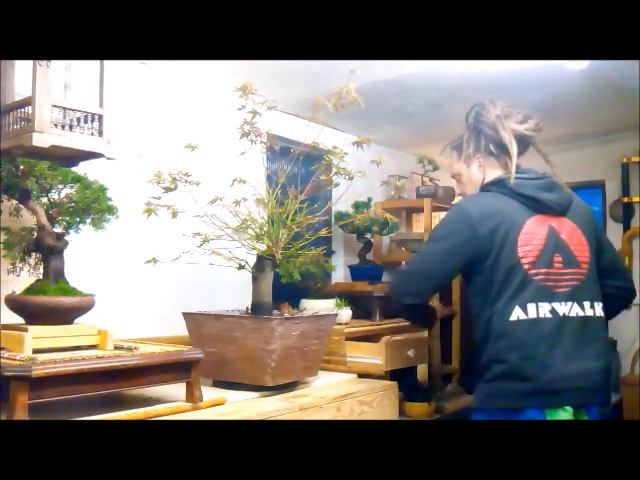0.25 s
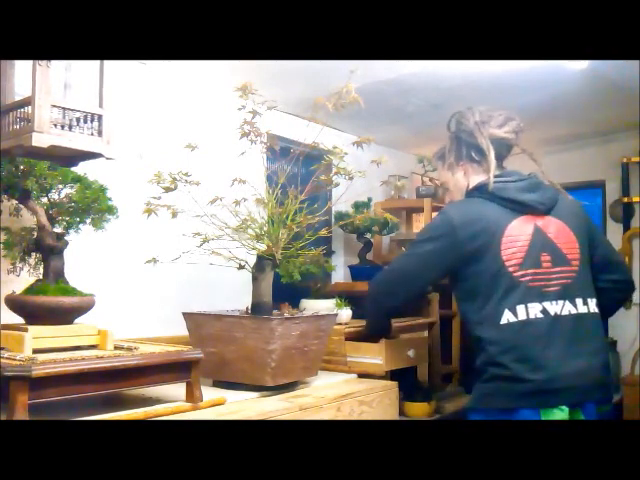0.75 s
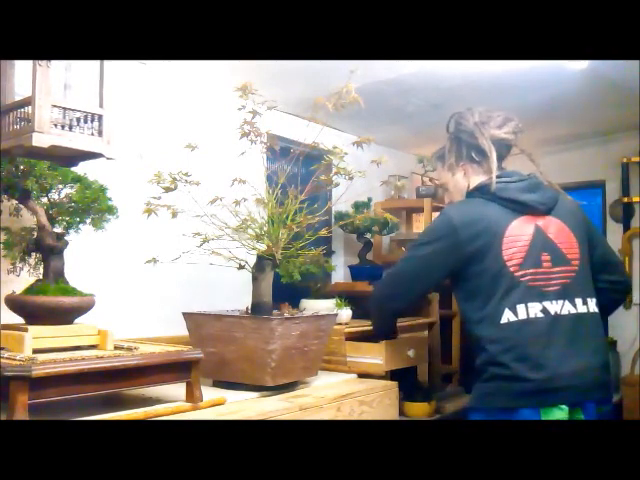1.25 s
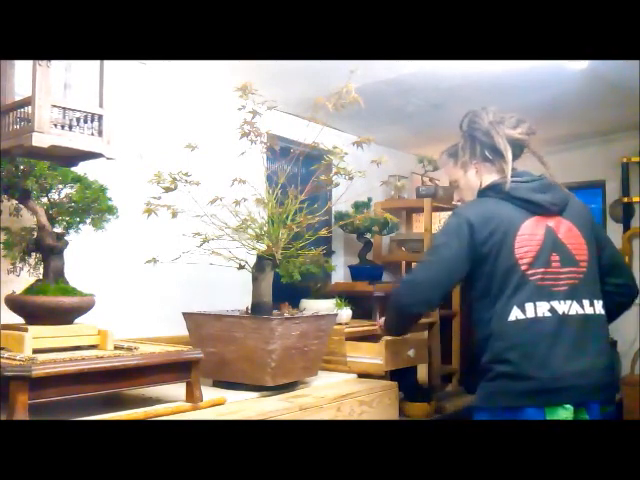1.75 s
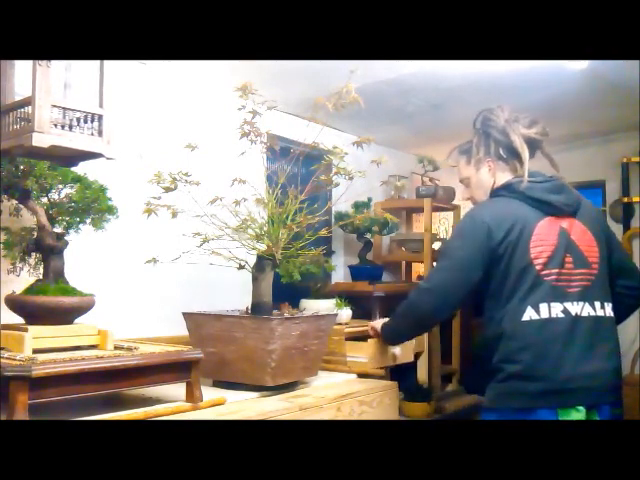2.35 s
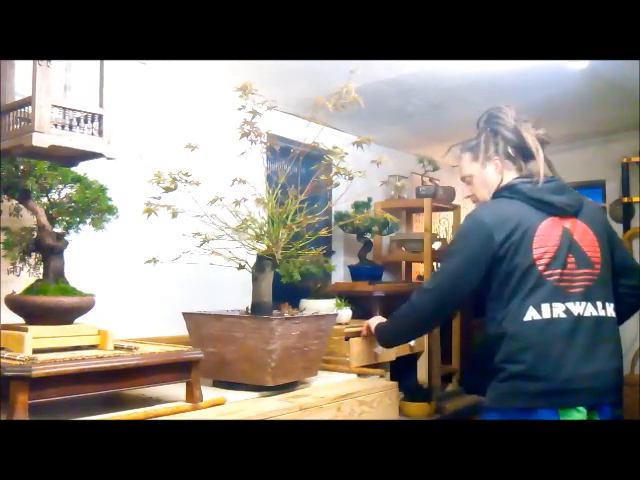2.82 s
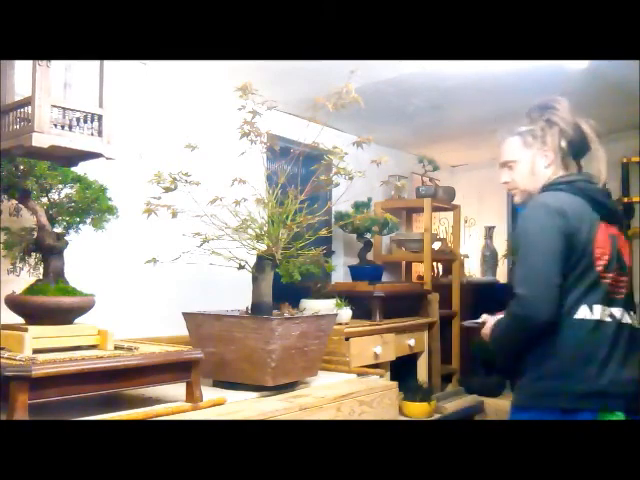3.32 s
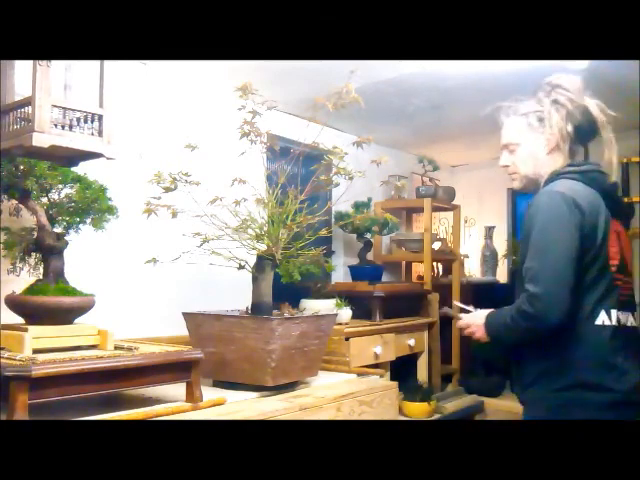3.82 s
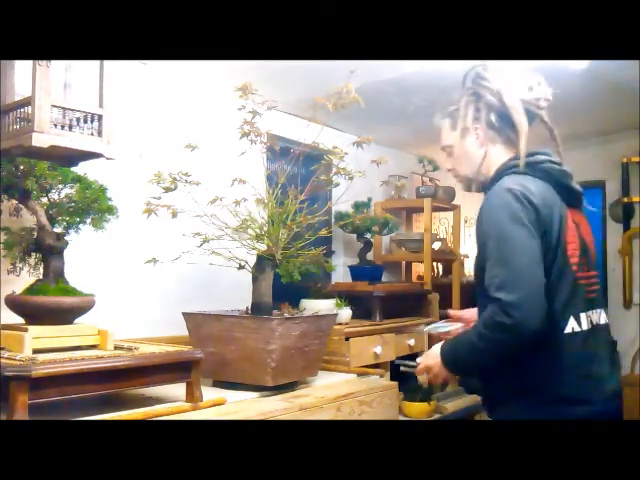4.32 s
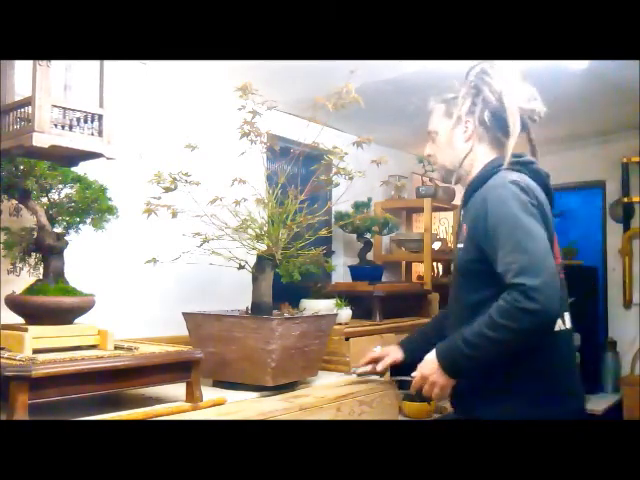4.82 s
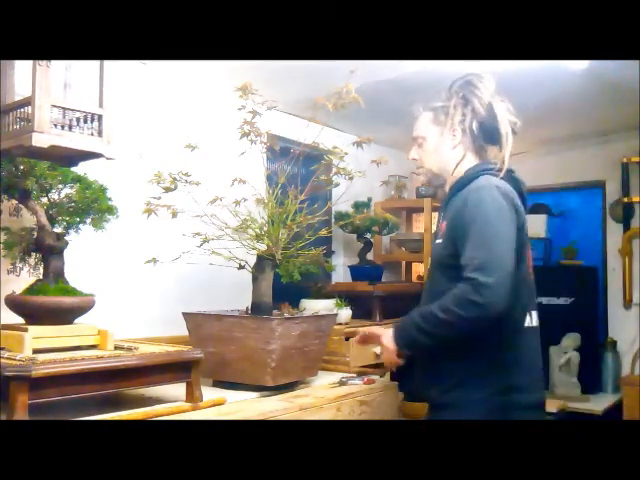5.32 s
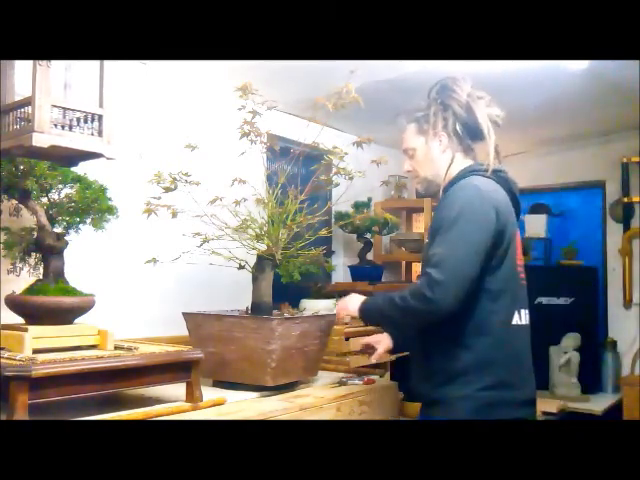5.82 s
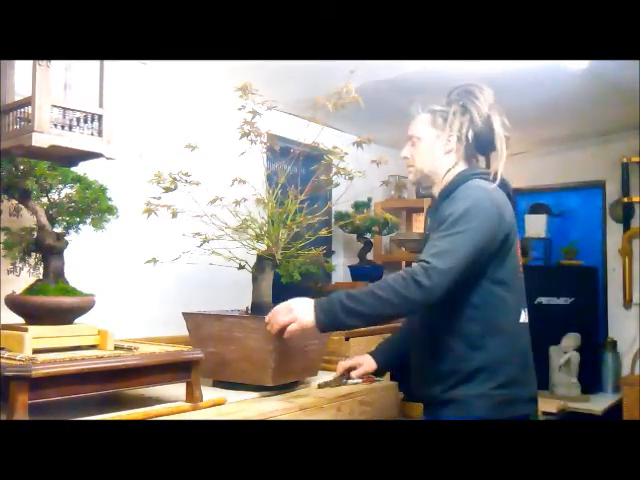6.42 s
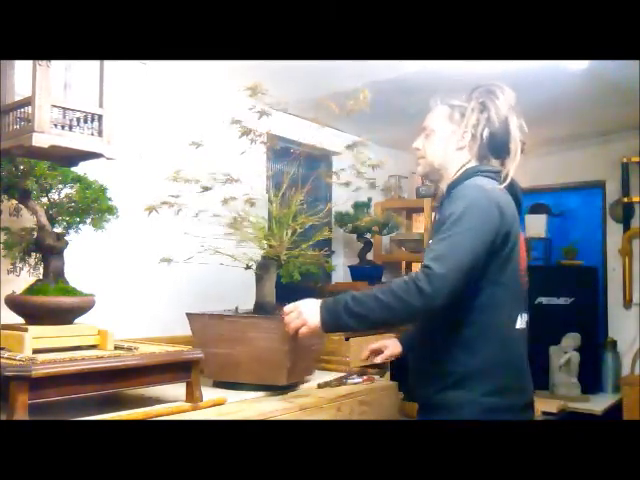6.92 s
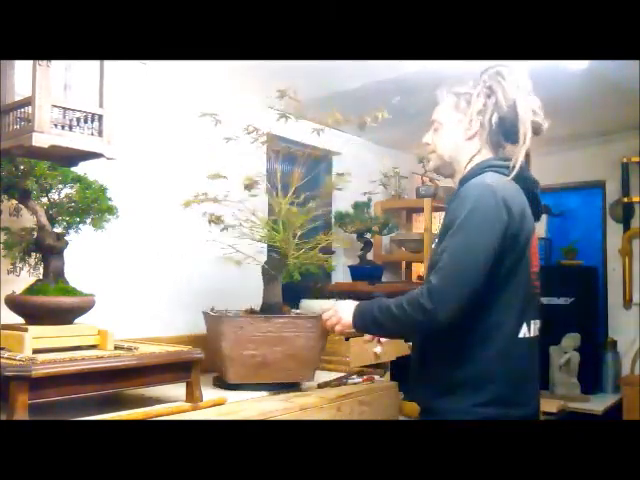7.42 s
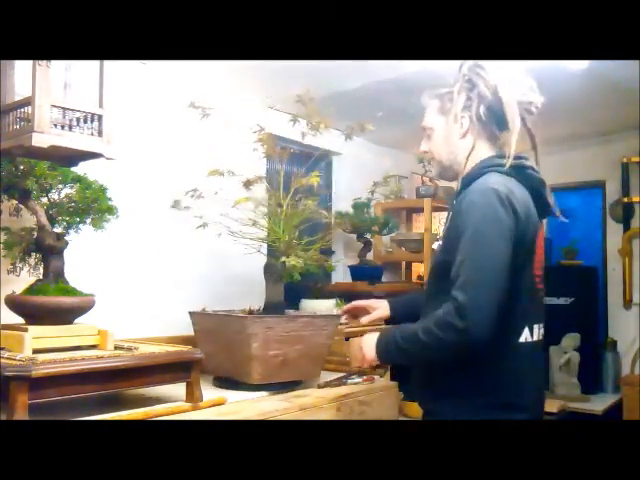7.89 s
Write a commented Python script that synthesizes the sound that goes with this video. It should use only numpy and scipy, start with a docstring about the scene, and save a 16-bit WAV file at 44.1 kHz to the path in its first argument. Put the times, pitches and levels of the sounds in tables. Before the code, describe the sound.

In a small hissy workshop, tools knock in a drawer, the drawer rumbles closed, steel clinks in a hand, and a wooden bench is knocked and scraped.

```python
"""A small workshop: someone rummages among steel tools in a wooden drawer, slides it shut and clinks
the tools in one hand, then knocks and scrapes things about on a bench, where a clay pot is turned.
Knocks and clinks are short noise bursts plus dying sines; scrapes and the drawer's slide are grains of
friction; its groan is a train of slips. Room reflections follow most of these sounds.
All is heard, over hiss and fluttering treble bands, through a microphone with a sharp presence peak."""
import sys
import numpy as np
from scipy import signal
from scipy.io import wavfile
from scipy.ndimage import uniform_filter1d

SR = 44100
rng = np.random.default_rng(int(sys.argv[2]) if len(sys.argv) > 2 else 0)


def to_wav(s):
    """Save 16-bit WAV."""
    ch = np.atleast_2d(s).T  # columns
    pcm = np.round(np.clip(ch, -1, 1) * 32767)  # PCM
    wavfile.write(sys.argv[1], SR, pcm.astype(np.int16))


N = 359400  # length in samples

# Layer trims in the functions come on top of the levels in these tables.
# spectrum of low room noise and hiss: hz, level_db (relative)
HISS_SPECTRUM = [(20, -11), (35, -13), (50, 2.5), (80, 5), (110, 9), (200, 3), (400, 0), (1000, -4.5),
                 (3000, -7), (4400, -3), (5600, -9), (7400, -13.5), (12500, -19.5), (16000, -13)]
# narrow bands of electrical noise: centre_hz, width_hz (before a factor in the filter), level_db,
# flutter_depth (0-1)
WHINE_BANDS = [(6590, 230, -83.5, 0.05), (8150, 240, -81, 0), (8845, 370, -74.5, 0.85),
               (10610, 510, -72.5, 0.02), (13530, 500, -80, 0.7)]
# moments when a faint fizz switches on in the treble: start_s
FIZZ_TIMES = [1.6, 2.53, 2.88, 6.73, 7.09, 7.59]
# tools knocking in the drawer: start_s, level_db, pitch_hz (of the thump), hardness_db
DRAWER_HITS = [(0.001, -41, 854, 3.5), (0.06, -46, 560, -9), (0.085, -37, 680, -7.5),
               (0.102, -43, 740, 5.5), (0.1525, -26, 540, 2), (0.274, -41.5, 526, 0),
               (0.331, -25.5, 1060, -7), (0.579, -56.5, 510, 2), (0.668, -66, 600, 15),
               (0.847, -45, 570, -6.5), (0.885, -41, 630, -5.5), (1.339, -46.5, 710, -1),
               (1.416, -38.5, 730, -21), (1.597, -63.5, 670, 16.5), (2.124, -53.5, 680, 4)]
# jolts of the drawer on its runners: start_s, level_db
DRAWER_JOLTS = [(2.438, -51), (2.507, -41), (2.668, -42), (2.801, -49)]
# ringing of the drawer: pitch_hz, level_db (before a tilt towards high pitches), t60_s
DRAWER_RING = [(104.8, 3, 0.33), (160, -0.5, 0.21), (395, -4, 0.17), (501.4, 3, 0.24), (878, -18, 0.22),
               (1012, -13, 0.13), (1576, -24, 0.12), (2290, -10.5, 0.064), (3020, -16, 0.26),
               (3600, -4, 0.06), (3680, -11, .12), (4270, -7, 0.39), (4564, -9, 0.053), (5050, -9.5, 0.17),
               (7460, -11, 0.57)]
# spectrum of the tick in a knock: hz, level_db (relative)
TICK_SPECTRUM = [(1500, -28), (2800, 5.5), (3600, 7), (4800, 6.5), (6000, -2), (7500, -14), (11000, -25.5),
                 (16000, -35)]
# decay of the workshop's reflections: hz, t60_s
ROOM_DECAY = [(100, 0.41), (300, 0.17), (800, 0.2), (2000, 0.21), (4500, 0.18), (8000, 0.13),
              (15000, 0.032)]
# short dry scrapes: start_s, length_s, level_db, low_edge_hz
SCRAPE_STROKES = [(0.657, 0.21, -56, 2050), (0.738, 0.082, -55, 397), (3.951, 0.12, -47, 2100),
                  (4.403, 0.093, -52, 850), (4.936, 0.099, -42, 1750), (6.74, 0.094, -55.5, 1620),
                  (7.025, 0.085, -38, 1070)]
# spectra of the drawer's rumble and of grit on its runners: hz, level_db (relative)
RUMBLE_SPECTRUM = [(25, -33), (65, -8), (105, 1.5), (190, 0.5), (280, -7.5), (420, -3), (800, -17),
                   (1600, -33), (5000, -58)]
GRIT_SPECTRUM = [(200, -17), (550, 0), (1100, 6.5), (2000, 2), (3800, 4), (5200, -3.5), (8000, -26),
                 (16000, -39)]
# resonances of the runners: pitch_hz, half_width_hz (at half amplitude), level_db (relative)
RUNNER_RESONANCES = [(200, 125, 3.5), (426, 34, 2.5), (657, 73, -20), (865, 35, 4.5), (1205, 110, -12)]
# the bench shudders as the drawer starts, meets its stop and settles: start_s, level_db
BENCH_SHUDDERS = [(2.341, -68), (2.675, -54), (2.935, -55.5)]
# steel tools meeting in the hand: start_s, level_db, brightness_hz, ring_db, rebound_change_db
STEEL_CLINKS = [(3.651, -41.5, 5360, -5, -2), (3.703, -49, 4000, 1, 1), (3.745, -32, 11000, 3.5, -3),
                (3.796, -41, 3260, -2, -1.5), (3.912, -57, 2960, -7, 0.5), (3.973, -45.5, 4940, -15, 1)]
# ringing of the blades: pitch_hz, level_db (before a tilt towards high pitches), t60_s
STEEL_RING = [(915, 0.5, 0.18), (1794, -10.5, 0.14), (2078, -7.5, 0.24), (2700, -4, 0.23),
              (3140, -7.5, 0.082), (3730, -25, .2), (4150, -22, .16), (4375, -5.5, 0.066),
              (4580, -4.5, 0.098), (4820, -1, .15), (4870, -4, 0.14), (5060, -7, .13), (5390, -4.5, 0.14),
              (6029, -14, 0.13), (7000, -33, .15), (10940, -20, 0.17)]
# knocks on the bench top: start_s, level_db, pitch_hz (of the thump), hardness_db
BENCH_HITS = [(5.1405, -33.5, 435, -20.5), (5.345, -28.5, 550, -16), (5.364, -35, 530, -28),
              (5.4475, -24.5, 644, -25), (5.534, -38.5, 485, -48), (6.4485, -24, 545, -31.5),
              (6.565, -46, 490, -37), (6.62, -27.5, 547, -12.5)]
# ringing of the bench: pitch_hz, level_db (before a tilt towards high pitches), t60_s
BENCH_RING = [(115.1, 2, 0.5), (256.3, 2.5, 0.29), (317, -3, 0.12), (405.3, -0.5, 0.17),
              (495.5, -1.5, 0.051), (548, -10.5, 0.14), (611, -8.5, 0.073), (775, -32, 0.14),
              (893, -3, 0.14), (1127, -5, 0.034), (1216, -7, 0.15), (1790, -6, 0.17)]
# response of the microphone: hz, level_db
MICROPHONE_RESPONSE = [(20, 4.5), (2800, -2), (3600, 0.5), (4150, 6.5), (4600, 8), (5200, 0.5), (6200, 2.5),
                       (20000, 1.5)]

HISS_DB, FLUTTER_HZ = -63, 29.5
JOLT_HZ, JOLT_CLACK_HZ, JOLT_CLACK_DB, JOLT_TICK_DB = 600, 2270, 6, -17
SCRAPE_RISE_S, SCRAPE_WIDTH_HZ = 0.046, 3100
# one push runs the drawer shut: quick start, steady run, slowing to rest
PUSH_START_S, PUSH_ATTACK_S, PUSH_HOLD_S, PUSH_RELEASE_S = 2.3, 0.041, 0.33, 0.38
# midway the wood binds: its slips grow faster and louder up to one moment, then ease off
BIND_S, BIND_RISE_S, BIND_FALL_S = 2.523, .036, .05
SLIPS_LOOSE_HZ, SLIPS_TIGHT_HZ = 135, 203.8
# the blades touch three times, each gap longer than the last
REBOUND_S, REBOUND_SPREAD = .006, 1.65
EDGE_HZ = 15850  # top of the heard band

HZ = np.fft.rfftfreq(8192, 1 / SR) + 1  # the offset keeps it above zero
RING = np.arange(SR // 2) / SR  # half a second, in s
TIME = np.arange(N) / SR


def amp(db):
    """Decibels to amplitude."""
    return 10 ** (np.asarray(db) / 20)


def evened(x):
    """Scales to an RMS of one."""
    return x / np.sqrt(np.mean(x ** 2) + 1e-20)


def read(points, hz):
    """A table of hz and value, joined by lines on a log axis."""
    f, value = np.transpose(points)
    return np.interp(np.log(hz + 1), np.log(f), value)


def add(mix, start_s, sound):
    """Lays a sound into the mix, cut off at the end."""
    part = mix[max(round(start_s * SR), 0):][:len(sound)]
    part += sound[:len(part)]


def band(low_hz, high_hz, order=2):
    """Gain of a pass band with soft edges."""
    low_side = 1 + (low_hz / HZ) ** (2 * order)
    high_side = 1 + (HZ / high_hz) ** (2 * order)
    return 1 / np.sqrt(low_side * high_side)


def hump(hz, octaves, skirt_db=-45):
    """A rounded band about a centre, with skirts."""
    away = np.log2(HZ / hz)
    return np.exp(-.5 * (away / octaves) ** 2) + amp(skirt_db) / (1 + away ** 4)


def hollow(modes, depth, width):
    """Broad peaks about a body's modes: they colour even its shortest noises."""
    peaks = sum(amp(db) / (1 + ((HZ / hz - 1) / width) ** 2) for hz, db, t60 in modes)
    return 1 + depth * peaks


def pulse(gain):
    """The most compact causal (minimum-phase) pulse with this spectrum."""
    log_gain = np.log(np.maximum(gain, gain.max() * 1e-5))
    circle = np.concatenate([log_gain, log_gain[-2:0:-1]])
    spectrum = np.exp(np.conj(signal.hilbert(circle)))
    return np.fft.ifft(spectrum).real[:len(HZ)]


def colour(x, gain):
    """Filters a sound with a spectrum."""
    return signal.oaconvolve(x, pulse(gain))[:len(x)]


def room(x, wet_db, gap_s=.002):
    """Direct sound and a tail of scattered reflections, drawn afresh on each call."""
    taps = rng.choice([-1., 1.], len(RING)) * (rng.random(len(RING)) < .12) * (RING > gap_s)
    hz, t, z = signal.stft(taps, SR, nperseg=256)
    t60 = read(ROOM_DECAY, hz)[:, None]
    tail = signal.istft(z * amp(-60 * t / t60), SR, nperseg=256)[1]
    response = amp(wet_db) * tail / np.linalg.norm(tail)
    response[0] += 1
    return signal.fftconvolve(x, response)


def grains(count, per_s, uneven_db):
    """Friction: many tiny catches of unequal size."""
    chance, size = rng.random(count), rng.exponential(1, count)
    sign = rng.choice([-1, 1], count)
    return (chance < per_s / SR) * sign * amp(uneven_db * np.minimum(size, 4))


def blow(db, gain):
    """A spectrum sized to give this level over a hundredth of a second."""
    return amp(db) * evened(gain) * np.sqrt(SR / 100)


def chatter(share, t60, rise_s=0.00056):
    """First contact, then a few milliseconds of tiny rebounds."""
    hits = rng.standard_normal(len(RING)) * amp(-60 * RING / t60) * (1 - np.exp(-RING / rise_s))
    hits *= share / np.linalg.norm(hits)
    hits[0] += 1
    return hits / np.linalg.norm(hits)


def struck(contact, hits, wet_db, gap_s=0.0014):
    """The crack of a blow and its spread through the room, keeping the blow's energy."""
    crack = room(colour(hits, contact), wet_db, gap_s)[:len(RING)]
    return crack * np.linalg.norm(pulse(contact)) / np.linalg.norm(crack)


def ringing(modes, detune=0.0045):
    """Dying sines; each blow sets their pitch, size and sign a little differently."""
    out = np.zeros(len(RING))
    variations = rng.standard_normal((len(modes), 3))
    for (hz, db, t60), (drift, size_db, side) in zip(modes, variations):
        sine = np.sign(side) * np.sin(2 * np.pi * hz * (1 + detune * drift) * RING)
        mode = sine * amp(-60 * RING / t60)
        out += amp(db + size_db) * mode / np.linalg.norm(mode) * np.sqrt(hz / SR)
    return out


def background(fizz_db=-69, fizz_length_s=0.302):
    """Low room noise and the microphone's hiss, with fluttering electrical bands and bursts of fizz."""
    out = amp(HISS_DB) * evened(colour(rng.standard_normal(N), amp(read(HISS_SPECTRUM, HZ))))
    flutter = np.sin(2 * np.pi * FLUTTER_HZ * TIME)
    for hz, width, db, depth in WHINE_BANDS:
        resonance = 1 / (1 + ((HZ - hz) / width * 1.07) ** 2)
        whine = colour(rng.standard_normal(N), resonance)
        out += amp(db) * evened(whine * (1 + depth * flutter))
    on = sum((TIME > s) & (TIME < s + fizz_length_s) for s in FIZZ_TIMES)
    treble = band(7900, 11260, order=30) * band(14000, 14000, order=2)
    fizz = colour(rng.standard_normal(N), treble)
    return out + amp(fizz_db) * on * evened(fizz)


def contacts(rows, clack_db, clack_share, clack_hz, clack_follow):
    """Splits knocks in three: hardness lifts tick and part of clack; a higher thump has a higher clack."""
    middle_hz = np.median([hz for s, db, hz, hardness in rows])
    parts = []
    for s, db, hz, hardness in rows:
        clack_level = db + clack_db + clack_share * hardness
        clack_pitch = clack_hz * (hz / middle_hz) ** clack_follow
        parts.append((s, db, hz, clack_level, clack_pitch, db + hardness))
    return parts


def knocks(rows, modes, ring_db, level_db, wet_db, rattle, rattle_t60, rattle_rise_s,
           thump_octaves, clack_octaves, skirt_db, bass_db, bass_hz, gap_s):
    """A soft thump, a harder clack and a tick go into a wooden body, which rings on."""
    out = np.zeros(N)
    body = hollow(modes, depth=2.2, width=.022)
    tick = amp(read(TICK_SPECTRUM, HZ))
    for s, thump_db, hz, clack_db, clack_hz, tick_db in rows:
        thump = hump(hz, thump_octaves, skirt_db) + amp(bass_db) * hump(bass_hz, 0.68)
        clack = hump(clack_hz, clack_octaves, skirt_db=-12)
        parts = blow(thump_db, thump * body), blow(clack_db, clack * body), blow(tick_db, tick * body)
        contact = np.linalg.norm(parts, axis=0)  # adds the three as powers
        hits = chatter(rattle, rattle_t60, rattle_rise_s)
        add(out, s, struck(contact, hits, wet_db, gap_s))
        # the body's colour is taken out again: the modes supply it
        add(out, s, colour(amp(ring_db) * ringing(modes), contact / body))
    return amp(level_db) * out


def jolts():
    """Every jolt on the runners has the same thump, clack and tick, at its own strength."""
    return [(s, db, JOLT_HZ, db + JOLT_CLACK_DB, JOLT_CLACK_HZ, db + JOLT_TICK_DB)
            for s, db in DRAWER_JOLTS]


def drawer_knocks():
    """Tools knock and the drawer jolts: blows into a roomy wooden box full of loose things."""
    rows = contacts(DRAWER_HITS, clack_db=-2.0, clack_share=0.24, clack_hz=1840, clack_follow=0.21)
    return knocks(rows + jolts(), DRAWER_RING, ring_db=-2.5, level_db=-6.5, wet_db=2.0,
                  rattle=2.8, rattle_t60=0.023, rattle_rise_s=0.0019,
                  thump_octaves=0.51, clack_octaves=0.63, skirt_db=-15,
                  bass_db=-8.0, bass_hz=177, gap_s=0.0017)


def scrapes(level_db=-4, catch_db=4.0, body_hz=1950, body_db=3):
    """Each stroke swells and fades, catching unevenly as its grains blur into a short rasp."""
    out = np.zeros(N)
    body = amp(body_db * hump(body_hz, .14))
    blade = hollow(STEEL_RING, depth=0.73, width=0.0077)
    for s, length, db, low_hz in SCRAPE_STROKES:
        t = np.arange(0, length, 1 / SR)
        wander = evened(uniform_filter1d(rng.standard_normal(len(RING)), 180))
        friction = grains(len(RING), 8000, 1.5) * amp(catch_db * wander)
        surface = band(low_hz, low_hz + SCRAPE_WIDTH_HZ, order=3) * band(200, 6100, order=5)
        rasp = evened(colour(friction, surface * body * blade)[:len(t)])
        stroke = np.interp(t, [0, SCRAPE_RISE_S, length], [0, 1, 0])
        add(out, s, room(amp(db) * rasp * stroke, wet_db=-5.0))
    return amp(level_db) * out


def drawer_slide(rumble_db=-61.0, grit_db=-61, grit_power=1.1):
    """The drawer rumbles on gritty runners, louder the faster it moves."""
    corners = PUSH_START_S + np.cumsum([0, PUSH_ATTACK_S, PUSH_HOLD_S, PUSH_RELEASE_S])
    speed = np.interp(TIME, corners, [0, 1, 1, 0])
    rumble = evened(colour(grains(N, 830, 2.5), amp(read(RUMBLE_SPECTRUM, HZ))))
    box = hollow(DRAWER_RING, depth=0.64, width=0.014)
    grit = evened(colour(grains(N, 600, 3.2), amp(read(GRIT_SPECTRUM, HZ)) * box))
    slide = rumble * amp(rumble_db) * speed + grit * amp(grit_db) * speed ** grit_power
    return room(slide, wet_db=-2.5)[:N]


def drawer_groan(groan_db=-44, slip_power=.25, jitter=0.038):
    """Where the wood binds it sticks and slips, and the slips set the runners resonating."""
    bind = np.exp(-np.maximum((BIND_S - TIME) / BIND_RISE_S, (TIME - BIND_S) / BIND_FALL_S))
    rate_hz = SLIPS_LOOSE_HZ + (SLIPS_TIGHT_HZ - SLIPS_LOOSE_HZ) * bind ** slip_power
    wander = evened(uniform_filter1d(rng.standard_normal(N), 200))
    turns = np.cumsum(rate_hz * (1 + jitter * wander)) / SR
    slips = np.diff(np.floor(turns), prepend=0)  # one pulse each time the wood lets go
    peaks = sum(amp(db) / (1 + ((HZ - hz) / width) ** 2) for hz, width, db in RUNNER_RESONANCES)
    groan = evened(colour(slips, peaks * band(120, 2000))) * amp(groan_db) * bind
    return room(groan, wet_db=-5.0)[:N]


def shudders(hz=120, octaves=0.69, swell_s=.022):
    """A low rumble of the bench's frame that swells and dies away."""
    out, u = np.zeros(N), RING / swell_s
    for s, db in BENCH_SHUDDERS:
        rumble = evened(colour(rng.standard_normal(len(RING)), hump(hz, octaves, skirt_db=-32)))
        add(out, s, amp(db) * u * np.exp(1 - u) * rumble)
    return out


def drawer_stop(start_s=2.665, db=-55, hz=48, swell_s=.018):
    """The drawer meets its stop and gives the whole bench a low shove: one swelling, dying sine."""
    out, u = np.zeros(N), RING / swell_s
    add(out, start_s, amp(db) * u * np.exp(1 - u) * np.sin(2 * np.pi * hz * RING))
    return out


def touches(count=3):
    """Each clink is a first touch and its rebounds."""
    return [(s + REBOUND_S * k ** REBOUND_SPREAD, db + k * change_db, bright_hz, ring_db)
            for s, db, bright_hz, ring_db, change_db in STEEL_CLINKS for k in range(count)]


def clinks(low_hz=3600, low_leak=0.23, ring_db=3, level_db=-4.5):
    """Steel on steel: the harder the contact, the higher its spectrum reaches; the blades ring on."""
    out = np.zeros(N)
    for s, db, bright_hz, free_db in touches():
        hardness = band(1400, bright_hz, order=2)
        contact = (band(low_hz, 5400, order=4) + low_leak * band(680, 16000, order=2)) * hardness
        rebounds = chatter(9, .028, .002)
        add(out, s, struck(blow(db, contact), rebounds, wet_db=-1.5))
        blades = amp(ring_db + free_db) * ringing(STEEL_RING, detune=0.0014)
        add(out, s, colour(blades, blow(db, hardness)))
    return amp(level_db) * out


def bench_knocks():
    """Things knock on the bench top: blows into solid wood, close by."""
    rows = contacts(BENCH_HITS, clack_db=4, clack_share=0.88, clack_hz=1670, clack_follow=1.66)
    return knocks(rows, BENCH_RING, ring_db=0.5, level_db=-4.5, wet_db=-1.5,
                  rattle=1.0, rattle_t60=0.016, rattle_rise_s=0.0022,
                  thump_octaves=0.39, clack_octaves=0.35, skirt_db=-6,
                  bass_db=-11, bass_hz=117, gap_s=0.0033)


def scene():
    """The drawer is across the room and full of loose things; the bench top is near and solid."""
    drawer = drawer_knocks() + drawer_slide() + drawer_groan() + drawer_stop()
    bench = shudders() + bench_knocks()
    return (background() + drawer + scrapes() + clinks() + bench)[None]


def record(dry):
    """The microphone's presence peak, then the band limit."""
    heard = colour(dry[0], amp(read(MICROPHONE_RESPONSE, HZ)))
    limit = signal.firwin(801, EDGE_HZ, window=("kaiser", 9), fs=SR)
    return signal.oaconvolve(heard, limit, "same")[None]


dry = scene()
out = record(dry)
to_wav(out)
```